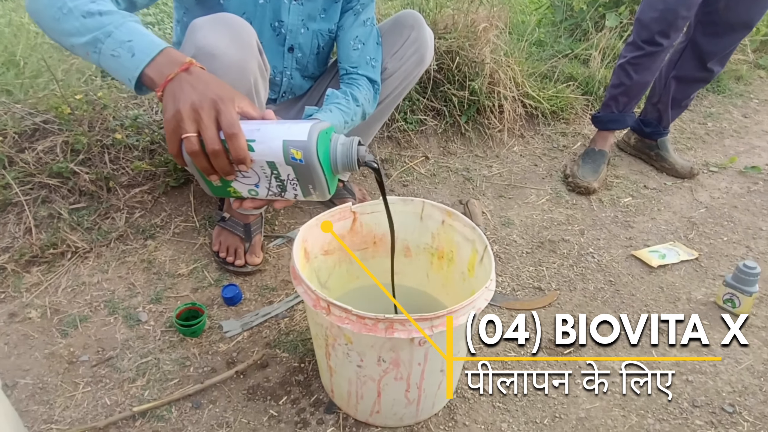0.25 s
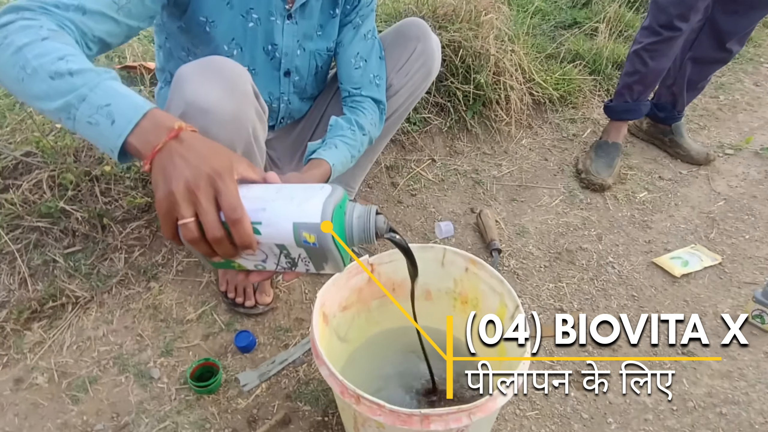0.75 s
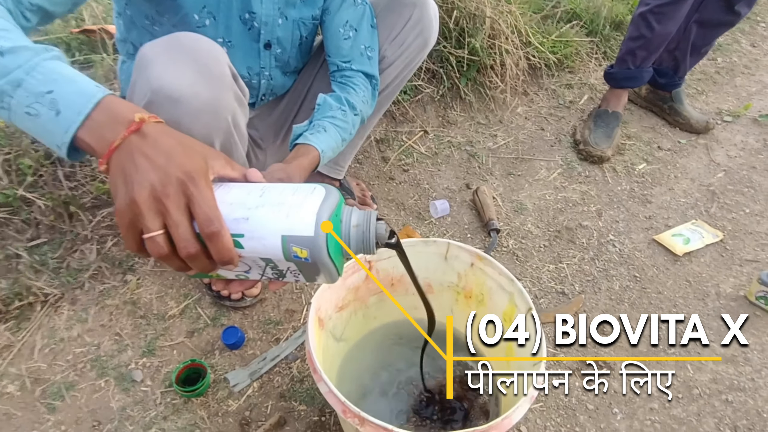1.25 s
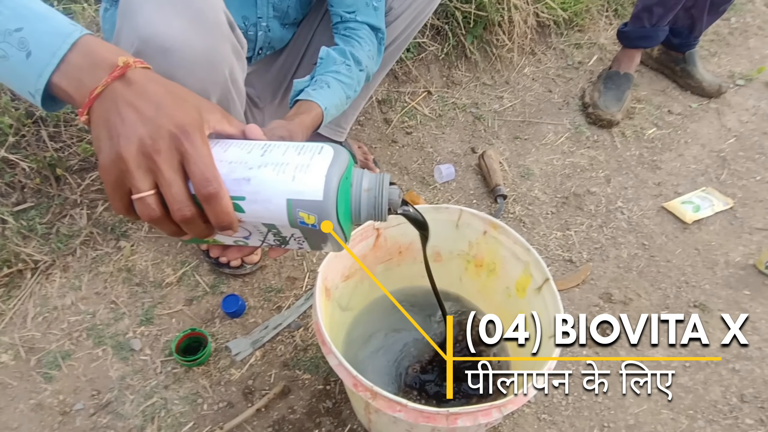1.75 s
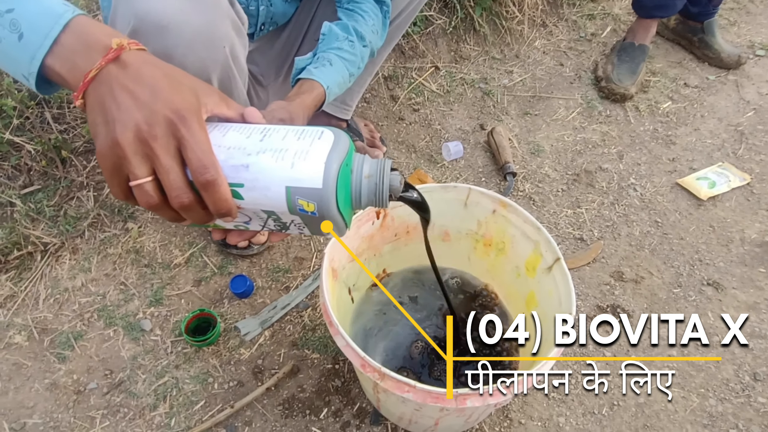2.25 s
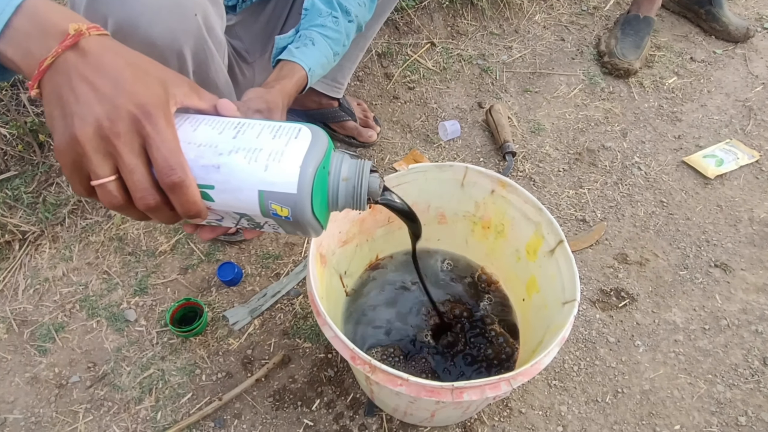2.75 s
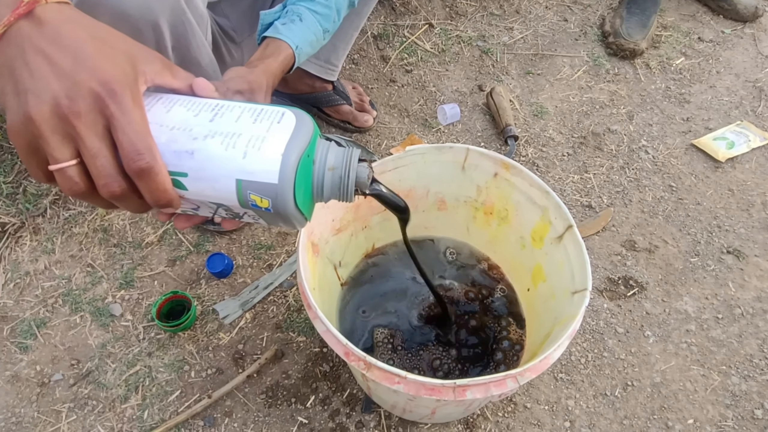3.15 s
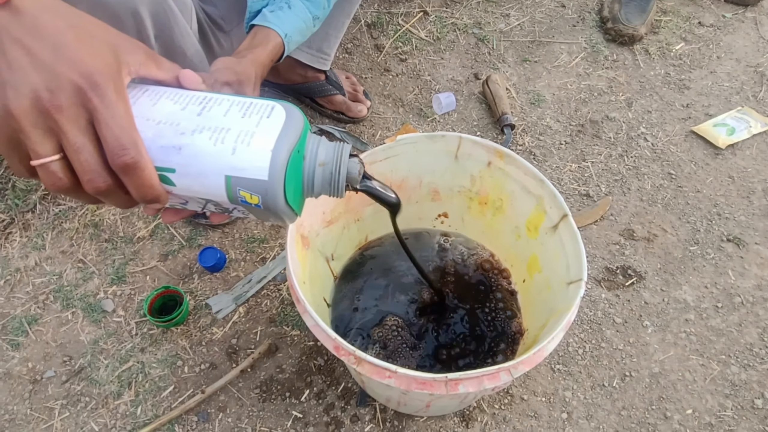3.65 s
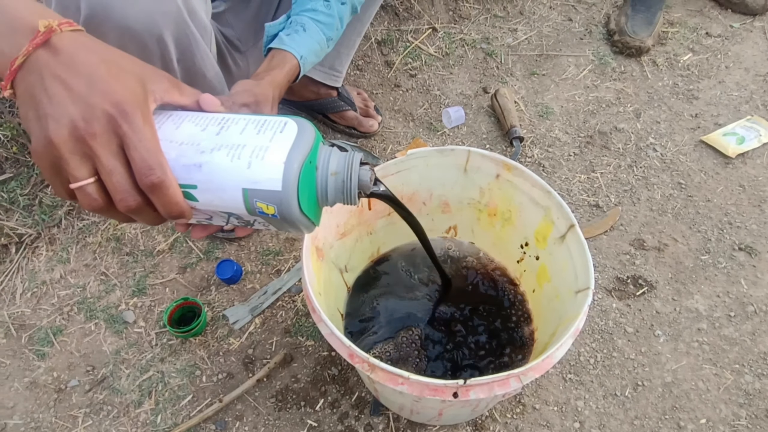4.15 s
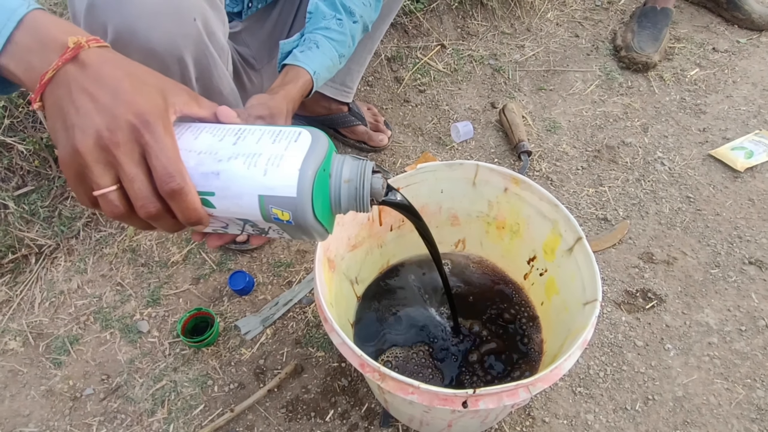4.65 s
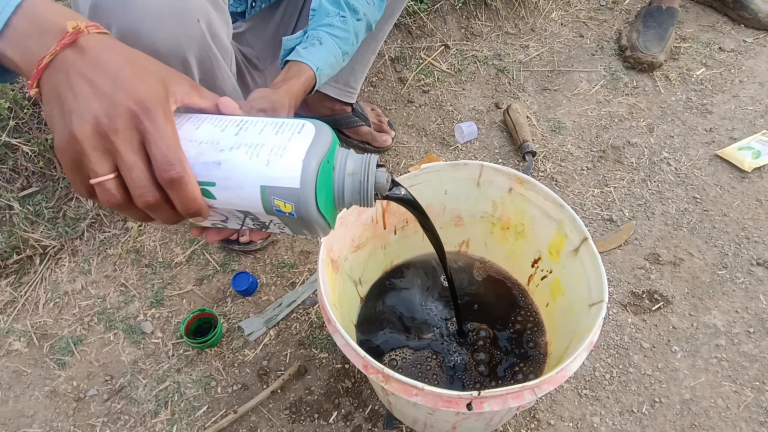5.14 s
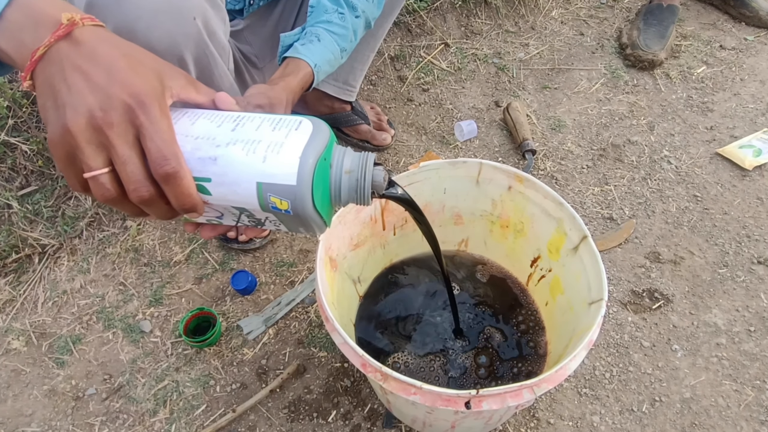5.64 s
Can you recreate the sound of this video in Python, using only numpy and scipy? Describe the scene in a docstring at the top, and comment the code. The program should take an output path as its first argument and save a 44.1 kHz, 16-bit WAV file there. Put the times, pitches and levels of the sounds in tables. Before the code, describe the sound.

Thick liquid pours into a bucket of water outdoors, plopping and splashing unevenly, then running almost silent, with wind puffs on the microphone.

```python
"""Outdoors, at a bucket of water. Thick liquid falls from a bottle and breaks into lumps that plop in
the bucket's air, splash and trap ringing bubbles, until the thread runs smooth and silent. Two far
engines hum under a distant rustle and a bird whistles. Puffs of air thump on the right port of a
hand-held microphone, and near the end something dry ticks beside it."""
import sys
import numpy as np
from scipy import signal
from scipy.fft import rfft, irfft
from scipy.io import wavfile
from scipy.ndimage import uniform_filter1d, map_coordinates

SR = 44100
rng = np.random.default_rng(int(sys.argv[2]) if len(sys.argv) > 2 else 0)


def master(y):
    """Save y as 16-bit WAV."""
    cut = np.clip(np.atleast_2d(y).T, -1, 1)
    pcm = np.round(cut * 32767)  # scale
    wavfile.write(sys.argv[1], SR, pcm.astype(np.int16))


N = 259749
T = np.arange(N) / SR
HZ = np.fft.rfftfreq(N, 1 / SR)

# Lumps hitting the water. Each row: start in seconds, level in dB, ring time in seconds.
LUMPS = [(0.928, -30.5, 0.082), (1.098, -29, 0.041), (1.225, -44, 0.065), (1.373, -25.5, 0.049),
         (1.416, -40.5, 0.1), (1.533, -32, 0.052), (1.682, -31, 0.086), (1.835, -32, 0.092),
         (1.985, -22, 0.1), (2.117, -41, 0.18), (2.256, -23, 0.04), (2.401, -28, 0.11), (2.619, -41, 0.17),
         (2.71, -41, 0.054), (2.82, -37.5, 0.1), (2.922, -36, 0.065), (3.083, -28, 0.1),
         (3.214, -30.5, 0.15), (3.359, -23, 0.074), (3.497, -22, 0.13), (3.622, -35.5, 0.1),
         (3.724, -36.5, 0.24), (3.865, -31, 0.13), (3.999, -35.5, 0.12), (4.135, -34.5, 0.057),
         (4.162, -34, 0.071), (4.394, -21, 0.061), (4.478, -48, 0.059)]
# Modes of the air in the bucket. Each row: pitch in Hz, level in dB, share of the ring time.
BUCKET_MODES = [(373.7, 6, 1), (473, -1.5, 0.25), (690, -16, 0.48), (1844, -19.5, 0.76), (2823, -39, 0.25)]
# Tone of the spray. Each row: frequency in Hz, level in dB.
SPRAY_EQ = [(760, -35), (1300, -10), (1790, -4), (2980, -0.5), (4190, -11), (4830, -5), (6850, -17.5),
            (8720, -35), (11000, -34), (14300, -58.5), (22000, -120)]
# The microphone's treble resonance. It colours a high hiss, faint throughout and swelling with the
# splashes. Each row: frequency in Hz, level in dB.
MIC_RESONANCE_EQ = [(10500, -40), (12300, 3), (13500, 7.5), (15200, 4), (15900, -45)]


def gain_of(db):
    """Decibels to amplitude."""
    return 10 ** (np.asarray(db) / 20)


def unit_rms(x):
    """Scales a signal to an RMS of one."""
    return x / np.sqrt(np.mean(x ** 2) + 1e-20)


def smooth(noise, width):
    """Turns white noise into a slow drift, averaged twice over width samples."""
    return unit_rms(uniform_filter1d(uniform_filter1d(noise, width), width))


def curve_at(points, hz):
    """Reads a curve along a logarithmic frequency axis."""
    point_hz, value = np.transpose(points)
    return np.interp(np.log(hz + 1), np.log(point_hz + 1), value)


def equalise(x, eq, depth=1):
    """Filters by an EQ curve whose decibels are scaled by depth."""
    return irfft(rfft(x) * gain_of(depth * curve_at(eq, HZ)), N)


def add(mix, start, sound):
    """Mixes a sound in at start seconds."""
    part = mix[round(start * SR):][:len(sound)]
    part += sound[:len(part)]


def distant_rustle():
    """A wide bed of far noise that swells and drifts in patches."""
    # Each row: frequency in Hz, level in dB.
    rustle_eq = [(15, -41), (25, -20), (53, -17.5), (86, -10), (136, -17), (150, -29), (346, -31),
                 (393, -32.5), (589, -20.5), (739, -24), (1290, -29), (2750, -32.5), (4800, -44.5),
                 (6020, -47.5), (10500, -84.5), (13600, -116), (22000, -120)]
    # Each row: frequency in Hz, correlation of left and right.
    stereo_likeness = [(60, 0.64), (180, 1), (550, 0.43), (1650, 0.073), (4970, -0.21), (15000, 0.27)]
    # Each row: frequency in Hz, left over right in dB.
    balance = [(60, -8), (130, 1.5), (290, 0.5), (640, -2.5), (1410, -3), (3100, -19), (6820, 2.5),
               (15000, 1)]
    frames, hz = N // 256 + 5, np.fft.rfftfreq(1024, 1 / SR)
    left_re, left_im, other_re, other_im, patches = rng.standard_normal((frames, 513, 5)).T
    patches = unit_rms(uniform_filter1d(uniform_filter1d(patches, 12, 0), 10, 1))
    swell = unit_rms(uniform_filter1d(rng.standard_normal(frames), 20))
    likeness = curve_at(stereo_likeness, hz)[:, None]
    left = left_re + 1j * left_im
    right = likeness * left + np.sqrt(1 - likeness ** 2) * (other_re + 1j * other_im)
    side = gain_of(curve_at(balance, hz) / 2)[:, None]
    spectra = np.array([left * side, right / side])
    spectra *= gain_of(curve_at(rustle_eq, hz)[:, None] + 1.8 * patches + .9 * swell)
    return gain_of(-56) * unit_rms(signal.istft(spectra, nperseg=1024, noverlap=768)[1][:, :N])


def engines():
    """Two far engines run at nearly the same speed, so their low orders beat."""
    # Each row: multiple of the shaft speed, level of the first and of the second engine in dB,
    # time of one quiet point of the beat in seconds.
    orders = [(1, -66, -67, .24), (1.5, -80, -66, 0), (2, -53.5, -59, .32), (3, -66, -71, .2)]
    shafts_hz, waver_db = (41.685, 40.76), .8
    out = np.zeros(N)
    for order, first_db, second_db, quiet_s in orders:
        for sign, db, hz in zip((1, -1), (first_db, second_db), shafts_hz):
            waver = smooth(rng.standard_normal(N), 3000)
            phase = 2 * np.pi * order * hz * (T - quiet_s) + .15 * waver
            out += sign * gain_of(db + waver_db * waver) * np.sin(phase)
    return np.sqrt(2) * out


def bubble(db, first_hz, last_hz, rise_ms, fall_ms, rough=0.72):
    """An air pocket rings unevenly and slides in pitch as it nears the surface."""
    ms = np.arange(0, rise_ms + 3 * fall_ms, 1000 / SR)
    wobble, flutter = smooth(rng.standard_normal((2, 6000)), 50)[:, :len(ms)]
    hz = first_hz + (last_hz - first_hz) * np.minimum(ms / (rise_ms + fall_ms), 1.3)
    hz *= 1 + 0.07 * rough * wobble
    attack = np.sin(np.pi / 2 * np.minimum(ms / rise_ms, 1)) ** 2
    age = np.maximum(ms - rise_ms, 0) / fall_ms
    envelope = attack * gain_of(db - 5 * age - 1.72 * age ** 2 + 5.3 * rough * flutter)
    return envelope * np.sin(2 * np.pi * np.cumsum(hz) / SR)


def bubble_swarm(per_s, lo_hz, hi_hz, spread_db, cycles, pitches=16):
    """Tiny rising bubbles at random times, many faint and a few loud."""
    strength = gain_of(spread_db * np.minimum(rng.exponential(1, N), 4))
    births = strength * (rng.random(N) < per_s / SR)
    pitch_index = rng.integers(0, pitches, N)
    out = np.zeros(N)
    for k, hz in enumerate(np.geomspace(lo_hz, hi_hz, pitches)):
        period_ms = 1000 / hz
        ping = bubble(0, hz, hz * (1 + 0.02496 * cycles), period_ms, cycles * period_ms)
        out += signal.oaconvolve(births * (pitch_index == k), ping)[:N]
    return unit_rms(out)


def churn():
    """Small bubbles fizz and turbulence stirs the bucket air, under a hiss at the microphone's resonance."""
    # Each row: time in seconds, fizz level in dB, bucket air level in dB.
    levels = [(0.0, -60.5, -82), (0.29, -63, -79), (0.53, -60.5, -71), (0.71, -57, -67), (0.95, -61.5, -85),
              (1.1, -56, -52), (1.34, -62.5, -59.5), (1.55, -54.5, -52), (1.82, -54, -63), (1.99, -56, -57),
              (2.3, -58.5, -60), (2.45, -60, -68.5), (2.83, -58, -56), (2.93, -52, -62), (3.07, -61, -64.5),
              (3.29, -48.5, -53.5), (4.06, -56, -63.5), (4.38, -55, -53.5), (4.6, -63, -60),
              (4.8, -50, -73)]
    # Each row: frequency in Hz, level in dB.
    fizz_eq = [(400, -7), (650, -2.5), (1800, -3), (4000, -9), (7000, -8.5), (9000, -44)]
    smooth_from_s = 4.7  # from here the thread slides in without bubbles
    calm_fizz_db, calm_hiss_db = -61.5, -91.5
    times, *faders = np.transpose(levels)
    fizz_db, air_db = (np.interp(T, times, db) for db in faders)
    churning = np.clip((smooth_from_s - T) * 4, 0, 1)
    swarm = bubble_swarm(700, 585.7, 4330, spread_db=4.56, cycles=12.1)
    fizz = unit_rms(equalise(swarm + 0.8 * rng.standard_normal(N), fizz_eq))
    lowest_mode = 1 / (1 + ((HZ - BUCKET_MODES[0][0]) / 65) ** 2)
    air = unit_rms(irfft(rfft(rng.standard_normal(N)) * lowest_mode, N))
    hiss = unit_rms(equalise(rng.standard_normal(N), MIC_RESONANCE_EQ))
    hiss_db = calm_hiss_db + 1.16 * churning * np.maximum(fizz_db - calm_fizz_db, 0)
    return churning * (fizz * gain_of(fizz_db) + air * gain_of(air_db)) + hiss * gain_of(hiss_db)


def bird():
    """Thin whistles, far off to the right, slide and level off, fluttering on the air."""
    # Each row: start and length in seconds, first and last pitch in Hz, level in dB.
    whistles = [(.008, .025, 3560, 3500, -62), (0.038, 0.064, 3320, 3400, -68),
                (0.065, .04, 3820, 3830, -63), (0.192, 0.052, 2800, 3240, -71),
                (0.427, 0.095, 2920, 3310, -71), (0.612, .15, 2970, 3890, -62.5),
                (0.795, .04, 3650, 3980, -65), (4.796, 0.016, 2700, 2860, -64.5),
                (4.947, 0.072, 2950, 2850, -72), (5.121, 0.015, 2700, 2720, -64.5),
                (5.172, .015, 2700, 2740, -68)]
    out = np.zeros(N)
    for start, length, first_hz, last_hz, db in whistles:
        t = np.arange(0, length, 1 / SR)
        wobble, flutter = smooth(rng.standard_normal((2, 8000)), 120)[:, :len(t)]
        hz = first_hz + (last_hz - first_hz) * np.sin(np.pi / 2 * t / length) + 23 * wobble
        tone = np.sin(2 * np.pi * np.cumsum(hz) / SR) * signal.windows.tukey(len(t), .4)
        add(out, start, np.sqrt(2) * gain_of(db + 5 * flutter) * tone)
    return out * gain_of([[-5], [4]])


def trapped_bubbles():
    """Single air pockets, trapped by the falling liquid, ring out as short blips."""
    # Each row: start in seconds, level in dB, first and target pitch in Hz, fall time in milliseconds.
    pockets = [(.085, -55, 2940, 3030, 7), (0.325, -39, 2010, 2020, 3.9), (0.342, -50, 910, 1050, 11),
               (0.364, -47, 1360, 1380, 5.6), (.398, -42.5, 2670, 2660, 3), (0.441, -39, 1160, 1250, 0.81),
               (0.611, -43, 5100, 5580, 8.6), (.62, -45, 2120, 1830, 6), (0.893, -30.5, 2040, 2250, 4),
               (.917, -37, 890, 890, 4.3), (1.038, -27, 3164, 3194, 7.7), (1.068, -39, 1860, 1840, 5),
               (1.071, -35.5, 1420, 1370, 8), (1.272, -42.5, 1456, 1450, 2.6), (1.33, -30, 1960, 2030, 2.7),
               (1.373, -28.5, 3050, 2970, 1.5), (1.469, -29.5, 3080, 3130, 1.6),
               (1.48, -43.5, 1900, 1790, 16), (1.534, -28, 2980, 2970, 5), (1.678, -32, 2910, 3230, 18.6),
               (1.683, -40.5, 1640, 1840, 3.3), (1.683, -26, 690, 690, 4.5), (1.835, -31, 2520, 2740, 2),
               (1.849, -34.5, 2630, 3110, 5.5), (1.934, -29, 2790, 2720, 3), (2.12, -44, 568, 901, 18),
               (2.142, -42.5, 910, 1526, 14.6), (2.228, -29, 1580, 1440, 4), (2.255, -31, 2980, 3000, 2.5),
               (2.277, -29, 2830, 2640, 1.5), (2.278, -33, 854, 1060, 10), (2.293, -40, 1080, 1547, 14.6),
               (2.402, -25.5, 2650, 2860, 1.9), (2.422, -37, 824, 990, 11), (2.459, -34.5, 5300, 5260, 2.4),
               (2.477, -39, 2100, 2120, 3.8), (2.582, -45, 2760, 2710, 2), (2.6, -36.5, 1570, 1400, 4),
               (2.652, -37, 2840, 3010, 6), (2.67, -38.5, 2120, 2010, 8.1), (2.876, -32, 2500, 2410, 3.1),
               (2.879, -32, 2460, 1930, 2.7), (2.899, -34, 1410, 1320, 5.1), (2.936, -37.5, 1980, 2390, 13),
               (3.036, -27.5, 2160, 2120, 2), (3.052, -30, 1630, 1900, 2.6),
               (3.072, -32.5, 1200, 1230, 2.4), (3.08, -28, 2790, 2810, 6), (3.175, -21, 1790, 1863, 3.9),
               (3.221, -35, 985, 900, 14), (3.309, -28, 1544, 1650, 20), (3.328, -27.5, 2500, 2650, 2.9),
               (3.333, -29, 1910, 2000, 5.6), (3.359, -35, 1330, 1370, 13), (3.357, -22, 2770, 2700, 0.78),
               (3.381, -32.5, 2800, 2490, 6), (3.425, -37.5, 1020, 980, 7.5), (3.428, -36.5, 2020, 1740, 8),
               (3.496, -7, 2750, 2640, 0.67), (3.546, -29.5, 4500, 5020, 5.5),
               (3.59, -32.5, 3700, 3760, 1.7), (3.59, -31.5, 1810, 1630, 3.6),
               (3.598, -23, 2570, 2700, 3.5), (3.612, -27.5, 1590, 1520, 1.1),
               (3.624, -25.5, 2590, 2800, 3.1), (3.64, -33.5, 2540, 2780, 5.4),
               (3.693, -37.5, 1020, 1030, 6.9), (3.727, -33, 2816, 2700, 13), (3.793, -30, 3190, 3400, 5.7),
               (3.81, -39.5, 425, 1026, 32.4), (3.822, -29, 1550, 1760, 3.4),
               (3.845, -31, 1530, 1855, 10.4), (3.866, -28, 4360, 4700, 2), (3.881, -20.5, 3610, 3570, 3.8),
               (4.022, -35.5, 1160, 595, 14.8), (4.058, -27.5, 2680, 2940, 2.6),
               (4.135, -25, 3780, 3950, 4.5), (4.139, -27.5, 4890, 4640, 6.5), (4.142, -27, 1630, 1680, 5),
               (4.25, -24, 2670, 2460, 1.5), (4.291, -37, 930, 913, 6.4), (4.437, -44, 860, 916, 9),
               (4.451, -50, 1620, 1890, 28), (4.536, -53, 1804, 1926, 33), (4.586, -48, 890, 1090, 9.7)]
    out = np.zeros(N)
    for start, db, first_hz, last_hz, fall_ms in pockets:
        add(out, start, bubble(db, first_hz, last_hz, rise_ms=1.3, fall_ms=fall_ms))
    return out


def splashes():
    """Bursts of bubbly spray, with a duller slap below and hiss at the microphone's resonance above."""
    # Each row: peak time in seconds, level in dB, seconds to fall 60 dB, milliseconds to rise 20 dB
    # (0.3 at the fastest), centre in Hz, relative levels of hiss and of slap in dB.
    bursts = [(0.1684, -35.5, 0.086, 5, 1780, -55, -27), (0.3236, -38, 0.12, 21, 2060, -60, -8),
              (0.398, -47, 0.24, 26, 2770, -79, 10.5), (0.612, -39.5, 0.14, 18, 3000, -43, -6),
              (0.673, -39, 0.15, 14, 3500, -36, 0.5), (0.8944, -33.5, 0.13, 21, 2030, -44, -4),
              (0.926, -38, 0.24, 16, 1670, -28, 6), (1.035, -33.5, 0.13, 17, 3400, -38, -37),
              (1.071, -49, 0.089, -7, 1850, -22, -6), (1.0985, -23.5, 0.067, 9.5, 4500, -27, -14),
              (1.1272, -35.5, 0.039, 6.0, 3070, -55, 9.5), (1.2006, -30, 0.027, 10, 3560, -73, -37),
              (1.271, -44, 0.036, 6.0, 1520, -43, 11), (1.3156, -31.5, 0.11, 10, 4400, -37, -33),
              (1.3718, -22, 0.097, 11, 3200, -34, -6), (1.459, -35.5, 0.08, 5, 3380, -28, -26),
              (1.47, -36.5, 0.11, -3, 3040, -24, -38), (1.5338, -21.5, 0.065, 15, 3140, -25, -26),
              (1.6207, -30, 0.066, 9, 2950, -55, -27), (1.6806, -24.5, 0.13, 12.5, 1850, -22.5, -4.5),
              (1.7484, -35, 0.18, 11, 3530, -23, -20), (1.7913, -39.5, 0.03, 6.0, 1960, -21, -12),
              (1.8342, -20.5, 0.071, 6.5, 3150, -15, -7), (1.919, -32.5, 0.08, 10, 3000, -31, -18),
              (1.933, -41, 0.09, 8, 2710, -22, -4), (1.9742, -28, 0.14, 8.5, 3250, -20, -5),
              (1.9874, -20.5, 0.054, 5, 1720, -23, -15), (2.082, -41.5, 0.042, 5, 2130, -48, -15),
              (2.1086, -38.5, 0.07, 8, 1590, -30, 3), (2.1896, -38, 0.24, 6.0, 1850, -39, -22),
              (2.2174, -36.5, 0.11, 17, 1820, -15.5, -26), (2.2557, -22.5, 0.12, 13, 3050, -32.5, -3),
              (2.35, -39.5, 0.13, 3, 3200, -27, -29), (2.401, -23.5, 0.075, 7.5, 1820, -19, -25),
              (2.4455, -30, 0.098, 11, 3550, -63, -5), (2.478, -38, 0.05, 12, 2100, -37, 3),
              (2.5604, -31.5, 0.11, 2, 3560, -36, -21), (2.583, -31, 0.13, 10.5, 2320, -50, -6),
              (2.6198, -27.5, 0.085, 4.5, 3770, -14, -9), (2.6549, -31, 0.13, 2, 2080, -47, -6),
              (2.7467, -36, 0.091, 18, 1810, -50, -15), (2.7978, -35.5, 0.075, 8.5, 3550, -37, 1),
              (2.8624, -35, 0.18, 4, 3500, -33, -30), (2.877, -24.5, 0.042, 11, 2350, -29, -30),
              (2.9226, -22.5, 0.096, 5.5, 2440, -30, -9), (3.028, -30.5, 0.068, 10, 2900, -42, -40),
              (3.0382, -30, 0.12, 1, 2100, -38, -24), (3.0814, -19, 0.093, 9.5, 2980, -31, -37),
              (3.1436, -25.5, 0.07, -7, 1720, -45, -8), (3.1767, -32.5, 0.065, 14, 1810, -47, -29),
              (3.219, -33.5, 0.034, 3, 4120, -26, -1.5), (3.2839, -38, 0.08, 5, 2900, -55, -21),
              (3.299, -23, 0.086, -3, 1760, -58, -18), (3.3573, -19, 0.068, 15.5, 2820, -12, -27),
              (3.378, -23.5, 0.07, 11, 2480, -59, -13), (3.4259, -22.5, 0.073, 4, 2130, -49, -30),
              (3.496, -15, 0.076, 4, 2840, -31.5, -26), (3.5453, -26, 0.091, 7.5, 5460, -25.5, -15),
              (3.5763, -29.5, 0.12, 15, 5940, -49, -24.5), (3.5974, -38, 0.08, 6.0, 2560, -44, -21),
              (3.6092, -19.5, 0.11, 5.5, 1530, -34.5, -16), (3.731, -30.5, 0.07, 13, 3000, -46, -10),
              (3.793, -29, 0.08, 6.0, 3310, -54, -18), (3.8227, -44, 0.098, 4, 1690, -48, -18),
              (3.8467, -35, 0.12, 6.0, 1670, -35, -3), (3.866, -18.5, 0.067, 8.5, 3060, -17.5, -6.5),
              (3.883, -22.5, 0.091, -6, 3600, -45.5, -6), (3.924, -32, 0.072, 6.0, 3420, -21, -23),
              (3.945, -33.5, 0.041, -4, 3760, -52, -22), (4.0005, -15.5, 0.068, 9.5, 2300, -28.5, -8.5),
              (4.056, -36.5, 0.096, 6.0, 3000, -48.5, -30), (4.1355, -18, 0.1, 13, 2516, -32.5, -22),
              (4.199, -34.5, 0.089, 9, 3770, -65, -2), (4.2486, -37.5, 0.19, 14, 2510, -32, -4),
              (4.2761, -23, 0.057, 13, 3090, -41, -14), (4.327, -29, 0.046, 8, 3380, -52, -4),
              (4.3878, -29.5, 0.051, -2, 3320, -62, 8)]
    # Each row: frequency in Hz, level in dB.
    slap_eq = [(160, -37), (600, 2.5), (1250, 3), (3100, -49)]
    tilt_from_hz, neutral_hiss_db = 3990, -37.5
    wet = 0.26 * rng.standard_normal(N) + bubble_swarm(2500, 604.6, 6710, spread_db=4.7, cycles=7.36)
    wet += .5 * bubble_swarm(4500, 6530, 12000, spread_db=6.5, cycles=3.9)
    hz, t, spectra = signal.stft(wet, SR, nperseg=256, noverlap=208)
    spectra /= np.sqrt(np.mean(abs(spectra) ** 2, 1))[:, None]
    local_power = uniform_filter1d(uniform_filter1d(abs(spectra) ** 2, 9, 0), 20, 1)
    spectra /= local_power ** .25  # tames the loudest bubbles
    clusters = rng.standard_normal(spectra.T.shape)
    clusters = unit_rms(uniform_filter1d(uniform_filter1d(clusters, 7, 0), 3, 1)).T
    treble = np.clip(np.log2((hz + 1) / tilt_from_hz), 0, 1)
    power = np.zeros(spectra.shape)
    for peak_s, db, t60, rise_ms, centre_hz, hiss_db, slap_db in bursts:
        near = slice(*np.searchsorted(t, [peak_s - .04, peak_s + .3]))
        age = t[near] - peak_s - .002
        envelope_db = np.where(age > 0, -60 * age / t60, 20 * age * 1000 / max(rise_ms, .3))
        spray_db = curve_at(SPRAY_EQ, hz) + 8.55 * np.exp(-(np.log((hz + 1) / centre_hz) / 0.19) ** 2)
        spray_db += 0.46 * (hiss_db - neutral_hiss_db) * treble  # hissier bursts are brighter
        colour = gain_of(spray_db) ** 2 + gain_of(curve_at(MIC_RESONANCE_EQ, hz) + hiss_db) ** 2
        colour += gain_of(curve_at(slap_eq, hz) + slap_db) ** 2
        power[:, near] += colour[:, None] * gain_of(db + envelope_db) ** 2
    spectra *= np.sqrt(power) * gain_of(1.88 * clusters)
    return np.sqrt(3 / 512) * signal.istft(spectra, SR, nperseg=256, noverlap=208)[1][:N]


def wind():
    """Puffs of air strike the right microphone membrane, each leaving a lumpy rumble that dies away."""
    # Each row: time of the trough in seconds, level in dB, pitch in Hz.
    puffs = [(0.264, -42.5, 202), (0.3837, -32.5, 252), (0.438, -36, 236), (0.551, -37, 189.5),
             (0.584, -37.5, 214), (0.6786, -30.5, 315), (0.9273, -24.5, 278), (0.9558, -25.5, 298),
             (0.9668, -31, 262), (1.497, -13.5, 290), (1.5439, -26.5, 259), (1.5938, -18, 290),
             (3.1446, -4.5, 258), (3.2537, -9, 258), (3.3958, -14, 266), (3.661, -31, 135),
             (3.8892, -8.5, 232), (4.0461, -13.5, 223), (5.068, -44, 220.3), (5.4481, -32.5, 199),
             (5.465, -34, 345)]
    # The membrane swings out, in and out, then settles.
    # Each row: offset from the trough and width, both in periods, then height.
    lobes = [(-.42, 0.093, .8), (0, 0.24, -1.25), (.6, 0.23, .45), (1.4, .5, 0.1)]
    rumble_eq = [(22, -50), (110, 0), (319, 0), (414.7, -50)]  # Hz, dB
    breeze_db, gust_db, gust_decay_s = -106, -43, 0.13
    thumps, airflow = np.zeros(N), np.full(N, gain_of(breeze_db))
    for trough_s, db, hz in puffs:
        periods = np.arange(-1, 3, hz / SR)
        swing = sum(height * np.exp(-((periods - at) / width) ** 2) for at, width, height in lobes)
        click = 1.8 * np.exp(-np.hypot(periods - lobes[0][0], .012) / .02)
        click *= gain_of(2 * db)  # only the strongest puffs click audibly
        add(thumps, trough_s - 1 / hz, gain_of(db) * (swing + click))
        gust = np.exp(-abs(T - trough_s) / np.where(T > trough_s, gust_decay_s, .02))
        airflow += gain_of(gust_db + 0.53 * db) * gust
    thumps = signal.sosfiltfilt(signal.butter(2, 115, "hp", fs=SR, output="sos"), thumps)
    buffeting = gain_of(7.4 * smooth(rng.standard_normal(N), 370))
    rumble = unit_rms(equalise(rng.standard_normal(N) * buffeting, rumble_eq))
    return (thumps + rumble * airflow) * gain_of([[-30], [0]])


def plops():
    """Each lump rings the air in the bucket; the tilting, heaving surface detunes and roughens it."""
    rise_s, detune, heave_depth = .0023, .01, .012
    out, t = np.zeros(N), T[:SR // 3]
    attack = np.sin(np.pi / 2 * np.minimum(t / rise_s, 1)) ** 2
    for start, db, ring_s in LUMPS:
        heave, flutter = smooth(rng.standard_normal((2, len(t))), 170)
        tilt = 1 + detune * rng.standard_normal()
        bend = tilt + heave_depth * heave + 0.11 * np.exp(-t / 0.0011)
        for hz, mode_db, ring_share in BUCKET_MODES:
            age = t / (ring_s * ring_share)
            envelope = attack * gain_of(db + mode_db - 42.8 * age - 22 * age ** 2 + 1.53 * flutter)
            add(out, start, envelope * np.sin(2 * np.pi * np.cumsum(hz * bend) / SR))
    return out


def surface_cracks():
    """The surface snaps open where each lump lands."""
    crack_db, t60 = -11.5, 0.0089
    out = np.zeros(N)
    for start, db, _ in LUMPS:
        add(out, start, gain_of(db + crack_db - 60 * T[:1500] / t60) * rng.standard_normal(1500))
    return equalise(out, SPRAY_EQ, depth=.5)


def pouring():
    """The water sounds, coloured by the bucket, reach the two microphone ports with wall echoes."""
    # Each row: frequency in Hz, left over right in dB.
    balance = [(60, 8), (110, 3), (200, -0.5), (380, 0.5), (700, -2), (1290, 4.5), (2380, -3.5), (4400, -7),
               (8120, 3.5), (15000, 4)]
    # Each row: frequency in Hz, phase lead of the left port in radians.
    left_lead = [(100, -10), (450, 0.22), (1640, 1.53), (2330, 1.32), (3360, 5.5), (5080, 8), (6890, 7.5),
                 (7700, 10), (15000, 13.5)]
    echo_db, echo_t60 = -5.5, 0.027
    water = splashes() + surface_cracks() + churn() + trapped_bubbles()
    upper_ring = 1 + sum(0.65 / (1 + 1j * (HZ - hz) / 30) for hz, _, _ in BUCKET_MODES[-2:])
    echoes = rng.standard_normal((600, 2)).T * gain_of(-60 * T[:600] / echo_t60) * (T[:600] > .001)
    wall = gain_of(echo_db) * rfft(echoes / np.linalg.norm(echoes[0]), N) * HZ / (HZ + 260)
    low_cut = (1j * HZ / 190.4) ** 2 / (1 + 1j * HZ / 222) ** 2
    direct = rfft(water) * upper_ring + rfft(plops()) * low_cut
    side = gain_of(curve_at(balance, HZ) / 2) * np.exp(.5j * curve_at(left_lead, HZ))
    left, right = irfft(direct * np.array([side, 1 / side]) * (1 + wall), N)
    wander_samples = 1.77 * smooth(rng.standard_normal(N), 910)  # the point of impact drifts
    return np.array([left, map_coordinates(right, [np.arange(N) + wander_samples], order=3)])


def dry_ticks():
    """Something dry ticks close to the right port."""
    # Each row: start in seconds, level in dB.
    ticks = [(5.417, -37), (5.431, -43)]
    # Each row: frequency in Hz, level in dB.
    tick_eq = [(300, -30), (900, 0), (3500, -2), (7000, -12), (9000, -32), (15000, -30)]
    out, t60 = np.zeros(N), .006
    for start, db in ticks:
        add(out, start, gain_of(db - 60 * T[:400] / t60) * rng.standard_normal(400))
    return equalise(out, tick_eq) * gain_of([[-12], [4]])


def scene():
    """The pour, wind and ticks up close; the bird, engines and rustle far behind."""
    return pouring() + wind() + dry_ticks() + bird() + engines() + distant_rustle()


def record(dry):
    """A steep low-pass trims the very top."""
    cutoff_hz = 16500
    low_pass = signal.firwin(511, cutoff_hz, window=("kaiser", 9), fs=SR)
    return signal.oaconvolve(dry, low_pass[None], "same")


dry = scene()
out = record(dry)
master(out)
```